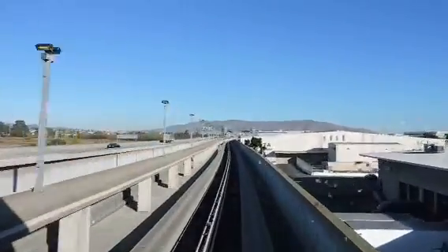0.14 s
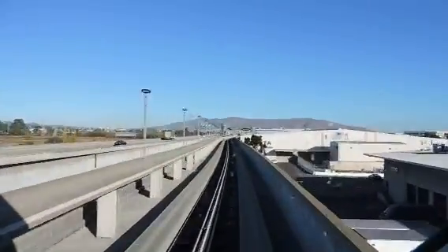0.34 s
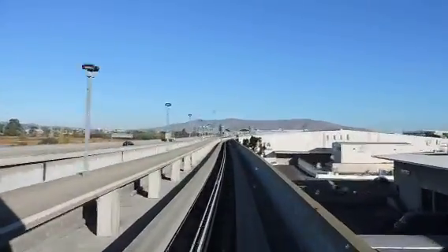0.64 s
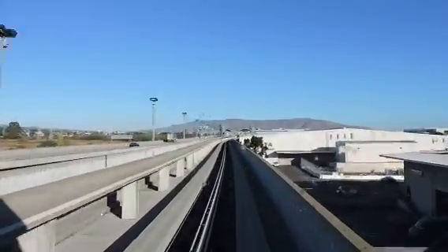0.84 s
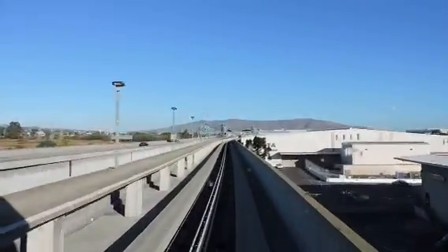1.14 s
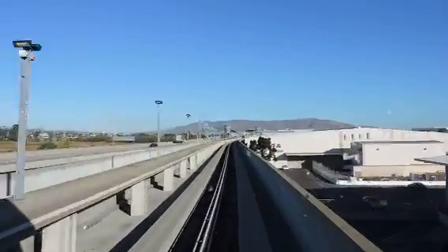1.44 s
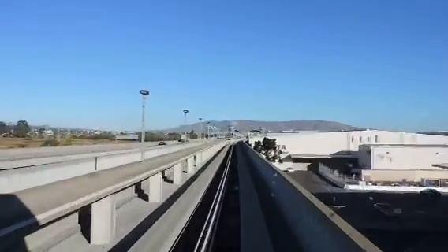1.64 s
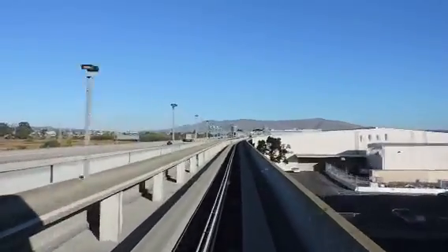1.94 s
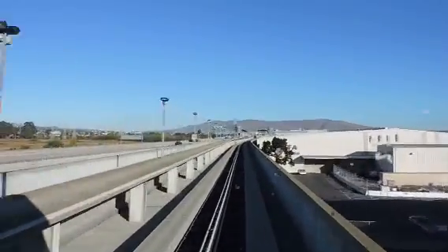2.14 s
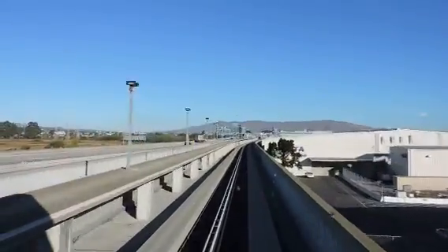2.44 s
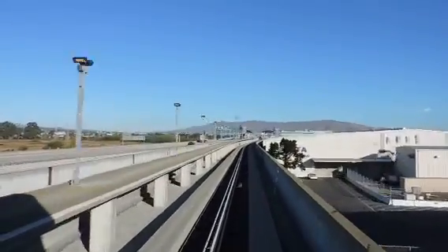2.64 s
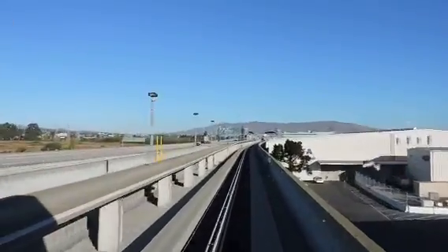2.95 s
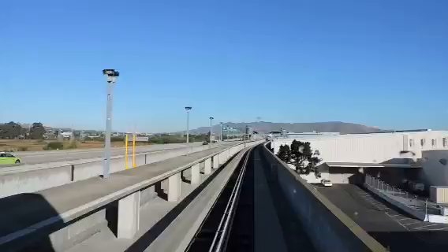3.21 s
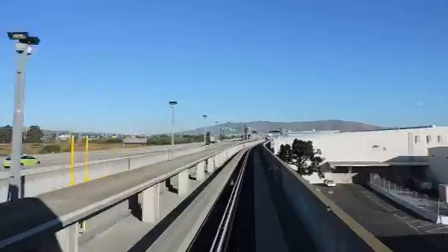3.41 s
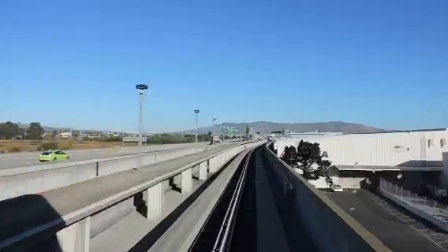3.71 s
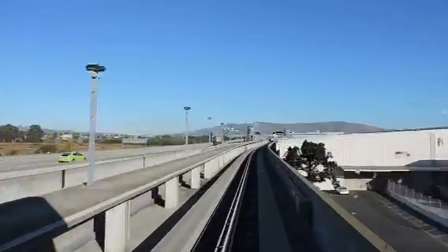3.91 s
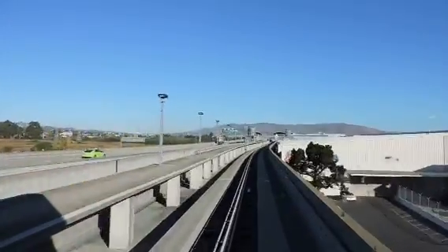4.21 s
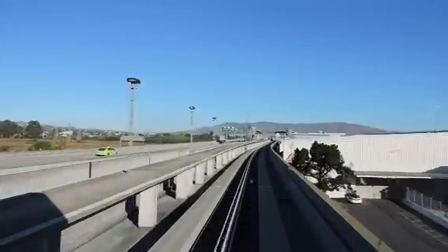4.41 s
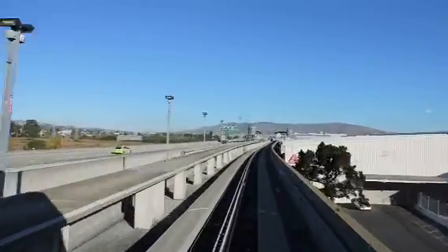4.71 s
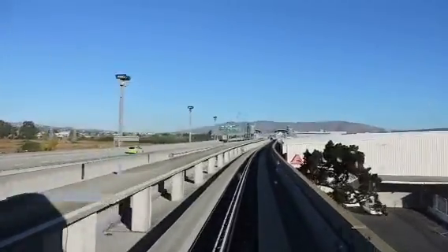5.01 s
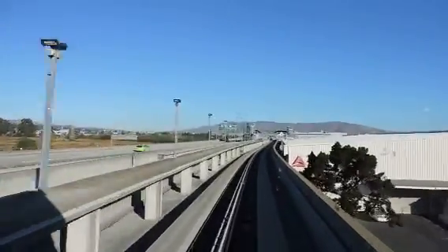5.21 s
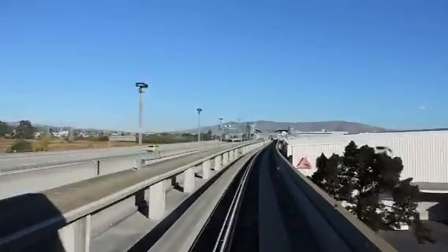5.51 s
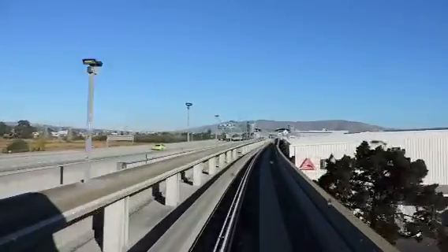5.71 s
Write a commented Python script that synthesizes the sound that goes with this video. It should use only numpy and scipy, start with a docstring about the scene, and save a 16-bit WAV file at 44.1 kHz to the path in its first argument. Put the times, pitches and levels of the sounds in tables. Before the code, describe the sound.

Heard from inside the front of an automated rubber-tyred car on an elevated concrete track. Heavy bass rumble and dull tyre roar run throughout, jolting unevenly. Soft thumps mark deck joints, trim rattles faintly, and a tiny squeak comes early. From about two seconds a gear whine enters and pulses more strongly toward the end. A short faint hiss comes past the middle, then sharp plastic ticks.

```python
"""Rubber-tyred people mover, interior

Ride along an elevated concrete guideway: filtered noise for body rumble, tyre roar and treble rush, resonances for
cabin boom, wavering sines for air throb, panel drone and a gear whine that climbs in pitch and swells in bursts.
Rough patches jolt the levels; joints thump the floor as decaying modes.
Fittings buzz, rattle and tick through plastic modes, trim squeaks as short sines, and one puff of noise hisses."""
import sys
import numpy as np
from scipy import signal
from scipy.fft import rfft, irfft, next_fast_len
from scipy.io import wavfile
from scipy.ndimage import uniform_filter1d

SR = 44100
rng = np.random.default_rng(int(sys.argv[2]) if len(sys.argv) > 2 else 0)


def store_wav(level_fs):
    """Save 16-bit WAV to argv[1]."""
    pcm = np.round(np.clip(np.atleast_2d(level_fs), -1, 1) * 32767)
    wavfile.write(sys.argv[1], SR, pcm.T.astype(np.int16))


N = 258413
TIME = np.arange(N) / SR
CUTOFF_HZ = 15800

# layer levels at 0 dB of road and jolt
RUMBLE_DB, THROB_DB, ROAR_DB, BOOM_DB, RUSH_DB = -23.5, -35, -34.0, -37.5, -66.0
# dB gained per dB of road roughness, jolt or roar
RUMBLE_PER_ROAD, THROB_PER_ROAD, THROB_PER_JOLT, RUSH_PER_ROAR = 0.21, 2.73, 2.2, 0.52
SIDEBAND_PER_JOLT = 0.33
# gear mesh: starting pitch, its climb as the car gains speed, fast level unevenness
MESH_HZ, MESH_RISE_HZ_PER_S, TOOTH_SHUDDER_DB = 667.8, 4.2, 1.3
PUFF_S, PUFF_DB, PUFF_ATTACK_DB_PER_S, PUFF_RELEASE_DB_PER_S = 3.735, -50.5, 330, 130


def from_db(db):
    """Decibels to gain."""
    return 10 ** (np.asarray(db) / 20)


def rms_one(x):
    """Scale to unit rms."""
    return x / np.sqrt(np.mean(x ** 2) + 1e-20)


def in_time(rows):
    """Each column of a curve at every sample."""
    s, *columns = np.transpose(rows)
    return [np.interp(TIME, s, c) for c in columns]


def at_hz(points, hz):
    """Read a spectrum on a log-frequency axis."""
    f, value = np.transpose(points)
    return np.interp(np.log(hz), np.log(f), value)


def pan(lean_db):
    """Left and right gains for a left-minus-right level difference."""
    return from_db(np.array([[.5], [-.5]]) * lean_db)


def swell(middle_s, length_s):
    """Smooth bell of height 1, length_s wide at half its height."""
    return np.exp2(-np.minimum(np.square(2 * (TIME - middle_s) / length_s), 60))


def bursts(rows, edge_s=.015):
    """Summed gain of scheduled bursts; each rises softly, holds and falls."""
    gain = 0
    for start_s, end_s, db in rows:
        rise = np.tanh((TIME - start_s) / edge_s)
        fall = np.tanh((TIME - end_s) / edge_s)
        gain = gain + from_db(db) * (rise - fall) / 2
    return gain


def drift(rate_hz):
    """Slow random curve of rms 1: noise through a double pole at 1/40 rate, interpolated."""
    step = 40
    r = np.exp(-2 * np.pi * rate_hz * step / SR)
    noise = rng.standard_normal(N // step + 2002)
    slow = signal.lfilter([1], [1, -2 * r, r * r], noise)[2000:]  # drop the settling
    return np.interp(np.arange(N) / step, np.arange(len(slow)), rms_one(slow))


def resonate(x, hz, width_hz):
    """Two-pole resonance with gain near 1 at its peak."""
    r = np.exp(-np.pi * width_hz / SR)
    zeros = np.array([1, 0, -1]) * (1 - r * r) / 2
    poles = [1, -2 * r * np.cos(2 * np.pi * hz / SR), r * r]
    return signal.lfilter(zeros, poles, x + 1e-18)


def cabin_noise(spectrum):
    """Coloured stereo noise, alike in both ears in the bass, diffuse in the treble; its middle has rms 1."""
    # left-right correlation: (frequency [Hz], correlation [-])
    ear_likeness = [(25, .95), (80, .985), (250, .945), (500, .74), (1000, .79), (2000, .28), (4000, -.12),
                    (9000, -.15), (15000, .05)]
    # left-right balance: (frequency [Hz], left minus right [dB])
    ear_lean = [(12, 11), (22, 8), (35, 5), (63, 3.2), (125, 1.5), (500, .3), (1200, 1.1), (15000, 1)]
    size = next_fast_len(N)
    hz = np.maximum(np.arange(size // 2 + 1) * SR / size, 1)
    mid, side = rfft(rng.standard_normal((2, size)))
    alike = np.clip(at_hz(ear_likeness, hz), -.99, .99)
    pair = np.sqrt(1 + alike) * mid + np.sqrt(1 - alike) * side * [[1], [-1]]
    coloured = pair * pan(at_hz(ear_lean, hz)) * from_db(at_hz(spectrum, hz))
    out = irfft(coloured, size)[:, :N]
    return out / np.std(out.mean(axis=0))


def steadied(x, span_s):
    """Even out the slow swells of a noise to rms near 1, keeping its fast grain."""
    power = uniform_filter1d(np.mean(np.atleast_2d(x), axis=0) ** 2, int(span_s * SR) + 1)
    return x / np.sqrt(power + 1e-12)


def tone(hz, waver_hz, flutter_db, ear_phase_rad=0.26):
    """Sine of rms near 1, wavering in pitch and level, its phase leading in the left ear."""
    phase = 2 * np.pi * np.cumsum(hz + waver_hz * drift(14)) / SR
    wave = np.sqrt(2) * np.sin(phase + ear_phase_rad * np.array([[1], [-1]]))
    return wave * from_db(flutter_db * drift(18))


def jolts():
    """Rises of rumble, roar and boom [dB] at every sample, as the track jolts the car or lets it glide."""
    # (middle [s], length [s], rumble rise [dB], roar rise [dB], boom rise [dB])
    track_patches = [(0.115, 0.038, -4, -1, 2.5), (0.335, 0.036, -0.5, -2, -4), (0.668, 0.062, 4, 3.5, 6.5),
                     (0.79, 0.13, 5, 2, 4.5), (0.897, 0.066, 4, 1.5, -2.5), (1.068, 0.042, 5, 0, 1),
                     (1.226, 0.069, -0.5, -2.5, -0.5), (1.43, 0.35, 4.5, 4.5, 4), (1.94, 0.62, 3, 1.5, 5),
                     (2.25, 0.1, -1, -1, -3), (2.357, 0.048, 1.5, 2, -1), (2.646, 0.18, 5, 1.5, 3),
                     (2.808, 0.13, -3, 1.5, -2), (3.2, 0.24, 5, 2.5, 4.5), (3.286, 0.14, -2, -0.5, -7),
                     (3.515, 0.11, 3.5, 1, 2), (3.656, 0.067, 0.5, 1.5, -2), (3.758, 0.053, 3, 3, 0),
                     (3.85, 0.037, -4, 0.5, -3), (3.998, 0.083, 4, 2.5, 3.5), (4.1, 0.04, 2, 0.5, -2),
                     (4.387, 0.07, 5.5, 4, 2), (4.488, 0.042, -5, -0.5, 1), (4.592, 0.035, -5, -1, 1),
                     (4.73, 0.08, -2, -0.5, -6), (4.924, 0.085, -0.5, 2.5, 3), (5.01, 0.056, 5, 2, 0.5),
                     (5.31, 0.028, 4, -0.5, 1.5), (5.401, 0.075, 1, 2, -2), (5.653, 0.38, 3.5, 1.6, 0)]
    return sum(np.outer(rises_db, swell(s, length_s)) for s, length_s, *rises_db in track_patches)


def rush(rush_db, flicker_db=2.5):
    """Running gear as flickering treble noise, plus a steady thin whistle from the drive electronics."""
    # treble spectrum: (frequency [Hz], relative density [dB])
    rush_spectrum = [(1500, -5), (3500, 15), (4500, 12), (5800, 8), (7000, 3), (9000, 2), (11000, -1),
                     (13500, 0), (15500, -6.5)]
    whistle = from_db(-83) * rms_one(resonate(rng.standard_normal(N), 9530, width_hz=160))
    return from_db(rush_db + flicker_db * drift(24)) * cabin_noise(rush_spectrum) + whistle


def body(rumble_db, throb_db, air_mode_hz=63.56):
    """Car body shaking on its suspension (bass noise); cabin air throbbing at its lowest mode (sine)."""
    # body spectrum: (frequency [Hz], relative density [dB])
    body_spectrum = [(5, -28.5), (12, 2), (22, 0), (33, -4.5), (41, -12), (52, -10), (63, -9), (75, -8),
                     (100, -7.5), (122, -5), (137, -9.5), (150, -23), (170, -27), (700, -125)]
    shake = from_db(rumble_db) * steadied(cabin_noise(body_spectrum), span_s=.1)
    throb = from_db(throb_db) * tone(air_mode_hz, waver_hz=3.5, flutter_db=2.5)
    return shake + throb * pan(3.0)


def puff(crackle_db=3.2):
    """One short hiss of coloured noise, finely crackling, with a fast rise and slower decay."""
    # hiss spectrum: (frequency [Hz], relative density [dB])
    puff_spectrum = [(800, 0), (2000, 10), (5000, -2), (8500, -2), (13000, -8), (16000, -22)]
    age_s = TIME - PUFF_S
    puff_db = PUFF_DB + np.minimum(PUFF_ATTACK_DB_PER_S * age_s, -PUFF_RELEASE_DB_PER_S * age_s)
    crackle = rms_one(from_db(crackle_db * drift(400)))
    return from_db(puff_db) * crackle * cabin_noise(puff_spectrum)


def squeaks(overtone_db=-17.0):
    """Rubbing trim in stick-slip: brief sines of unsteady pitch; low ones carry an octave."""
    # (start [s], length [s], pitch [Hz], pitch spread [Hz], level [dB])
    squeak_rows = [(1.563, .027, 3170, 10, -48), (1.586, 0.026, 3180, 12, -47.5),
                   (1.606, .055, 3160, 10, -60), (3.666, 0.053, 13550, 160, -60),
                   (3.67, .04, 12200, 200, -70), (4.332, 0.031, 11400, 700, -64)]
    out = np.zeros(N)
    for s, length_s, hz, spread_hz, db in squeak_rows:
        shape = np.sin(np.pi * np.clip((TIME - s) / length_s, 0, 1) ** 0.8)
        phase = 2 * np.pi * np.cumsum(hz + spread_hz * drift(350)) / SR
        octave = from_db(overtone_db) * np.sin(2 * phase) * (2 * hz < CUTOFF_HZ)
        out += from_db(db) * shape * (np.sin(phase) + octave)
    return out * pan(3.2)


def chatter(per_s, spread_db=3.0):
    """Random small contacts of uneven strength, different at each ear; rms 1."""
    contacts = (rng.random((2, N)) < per_s / SR) * rng.choice([-1, 1], (2, N))
    strength_db = spread_db * np.minimum(rng.exponential(1, (2, N)), 4)
    return rms_one(contacts * from_db(strength_db))


def fitting_ring(force, heft_db):
    """Hard plastic modes of alternating sign; heft_db tilts their levels per octave below 9 kHz."""
    # (frequency [Hz], width [Hz], level [dB])
    plastic_modes = [(1000, 140, 9), (1380, 160, 10), (1650, 120, 9), (1950, 260, 9), (2600, 450, 2.5),
                     (3600, 900, -4), (4900, 800, -8), (6900, 500, -5.5), (8100, 800, -2), (9100, 700, -2),
                     (11000, 900, 0), (12600, 1200, 0), (14500, 1000, -9)]
    out = 0
    for k, (hz, width_hz, db) in enumerate(plastic_modes):
        mode_db = db + heft_db * np.clip(np.log2(9000 / hz), -1, 2)
        out = out + (-1) ** k * from_db(mode_db) * resonate(force, hz, width_hz)
    return out


def fittings(rush_db, tail_db=-22.0, tail_t60_s=.19, trim_db=6.5, buzz_db=-7.0):
    """Loose trim driven through plastic modes: fitful buzz, short rattles, sharp ticks with a short echo tail."""
    # rattles: (middle [s], length [s], level before trim [dB], left minus right [dB], heft [dB/octave down])
    rattle_rows = [(1.055, 0.016, -64, -6, 0), (1.33, .025, -60, 2, 4), (1.4, .06, -64, 1, 4.5),
                   (1.962, .025, -65, 2, 1), (2.958, 0.033, -69, 1, 9), (3.288, 0.024, -58, .5, 4),
                   (4.292, .02, -62, 1, 6.5), (4.35, .035, -59, 1, 4.5), (5.0, .025, -63, 0, 2)]
    # ticks: (time [s], level before trim [dB], left minus right [dB], t60 [s], heft [dB/octave down])
    tick_rows = [(0.641, -42, -4, .022, 0), (0.6835, -51, -5, .03, 2), (3.9746, -31, -5, 0.0098, 4),
                 (4.0054, -54, -.5, .02, -1), (4.625, -32.5, -3, 0.011, 0.5), (4.632, -54, -1, .015, 3),
                 (4.6655, -57, 0, .02, 3)]
    buzz_gain = from_db(rush_db + buzz_db + 3 * drift(20)) * pan(1.0)
    out = fitting_ring(buzz_gain * rng.standard_normal((2, N)), 0)
    contacts, crack = chatter(per_s=3000), rng.standard_normal((2, N))
    for s, length_s, db, lean_db, heft_db in rattle_rows:
        span = slice(int((s - 2 * length_s) * SR), int((s + 2 * length_s) * SR))
        gain = from_db(db + trim_db) * pan(lean_db)
        out[:, span] += fitting_ring(gain * swell(s, length_s)[span] * contacts[:, span], heft_db)
    for s, db, lean_db, t60_s, heft_db in tick_rows:
        span = slice(int(s * SR), int(s * SR) + SR // 2)
        age_s = TIME[span] - s
        shape = from_db(-60 * age_s / t60_s) + from_db(tail_db - 60 * age_s / tail_t60_s)
        gain = from_db(db + trim_db) * pan(lean_db)
        out[:, span] += fitting_ring(gain * shape * crack[:, span], heft_db)
    return out


def thumps(rise_s=0.0035):
    """Tyres dropping softly over deck joints: each sets the floor modes ringing."""
    # joints: (time [s], level [dB])
    joint_rows = [(0.083, -37), (0.73, -30), (1.29, -27), (1.41, -28.5), (1.51, -29.5), (2.555, -27.5),
                  (2.9, -30), (3.972, -24.5), (4.621, -36), (5.134, -30.5), (5.54, -26.5)]
    # floor: (frequency [Hz], level re the thump [dB], t60 [s])
    floor_modes = [(103, -2.5, 0.15), (211, -9.5, 0.25), (240.5, 2.5, 0.26), (297, 1, 0.14)]
    out = np.zeros(N)
    for s, db in joint_rows:
        span = slice(int(s * SR), int(s * SR) + SR // 2)
        age_s = TIME[span] - TIME[span][0]
        onset = 1 - np.exp(-age_s / rise_s)
        for hz, mode_db, t60_s in floor_modes:
            ring = np.sin(2 * np.pi * (hz * age_s + rng.random()))
            out[span] += from_db(db + mode_db - 60 * age_s / t60_s) * onset * ring
    return out * pan(1.0)


def drive(jolt_db, idle_db=-1.5, drone_hz=491.0):
    """Gear mesh tone swelling as the teeth take load, a sideband on either side, and a fitfully droning panel."""
    # sidebands: (time [s], lower level [dB], upper level [dB])
    sideband_curve = [(1.8, -75, -72), (2.05, -44, -57), (2.6, -46, -62), (3.6, -46, -54),
                      (3.9, -43.5, -49.5), (5.0, -55, -49), (5.86, -50, -50)]
    # tooth load: (start [s], end [s], level [dB])
    whine_rows = [(2.33, 2.56, -46), (2.585, 2.675, -32), (2.745, 2.9, -35), (2.945, 3.11, -34.5),
                  (3.12, 3.31, -38), (3.45, 3.53, -37.5), (3.56, 3.83, -39), (3.86, 3.94, -38),
                  (4.04, 4.24, -39), (4.26, 4.36, -34.5), (4.38, 4.425, -27.5), (4.46, 4.7, -40.5),
                  (4.75, 4.87, -36), (4.9, 4.94, -33), (4.945, 5.01, -27.5), (5.04, 5.26, -36),
                  (5.35, 5.445, -29), (5.485, 5.69, -28.5), (5.72, 5.9, -35)]
    # panel drone: (start [s], end [s], level [dB])
    drone_rows = [(2.575, 2.62, -34.5), (3.18, 3.22, -38), (4.63, 4.72, -37), (4.835, 4.885, -33),
                  (5.06, 5.135, -34.5), (5.24, 5.385, -35), (5.405, 5.5, -35), (5.5, 5.575, -28.5),
                  (5.575, 5.71, -35.5), (5.71, 5.83, -39)]
    mesh_hz = MESH_HZ + MESH_RISE_HZ_PER_S * TIME
    spacing_hz = mesh_hz * .182
    lower_db, upper_db = in_time(sideband_curve) + SIDEBAND_PER_JOLT * jolt_db
    idle = from_db(lower_db + idle_db)  # whine between bursts follows the lower sideband
    load = (idle + bursts(whine_rows)) * from_db(TOOTH_SHUDDER_DB * drift(60))
    whine = load * tone(mesh_hz, waver_hz=2.6, flutter_db=1.0)
    lower = from_db(lower_db) * tone(mesh_hz - spacing_hz, waver_hz=2.2, flutter_db=2.5)
    upper = from_db(upper_db) * tone(mesh_hz + spacing_hz, waver_hz=3.5, flutter_db=3.0)
    drone = bursts(drone_rows) * tone(drone_hz, waver_hz=2.5, flutter_db=1.2)
    return (whine + lower + upper) * pan(-0.36) + drone * pan(.3)


def tyres(roar_db, boom_db, grain_db=1.01):
    """Rubber on rough concrete: broad noise roar, and cabin resonances stirred by noise."""
    # roar spectrum: (frequency [Hz], relative density [dB])
    roar_spectrum = [(110, -1.5), (170, -2.5), (205, -1.5), (300, 1), (405, -8), (470, -3.5), (720, -5.5),
                     (905, -10.5), (970, -8.5), (1150, -8), (1330, -12), (1650, -13.5), (2400, -25.5),
                     (3400, -30), (4600, -40), (8000, -93)]
    # cabin resonances: (frequency [Hz], width [Hz], level re the boom [dB])
    cabin_modes = [(232, 4, -9), (250.9, 7.1, -6.5), (276.3, 4.3, -11), (294, 8.5, -25.5),
                   (371.1, 8.9, -11.5), (487.6, 11.6, -10), (610.6, 9.9, -18.5), (1150, 13, -21.5),
                   (1190, 12, -17), (3430, 170, -33)]
    roar = from_db(roar_db + grain_db * drift(28)) * cabin_noise(roar_spectrum)
    boom = np.zeros(N)
    for hz, width_hz, db in cabin_modes:
        ringing = resonate(rng.standard_normal(N), hz, width_hz)
        boom += from_db(db) * steadied(ringing, span_s=0.55)
    return roar + from_db(boom_db) * boom * pan(0.97)


def scene():
    """Mix at the front window; road and jolts set the running layers and the trim buzz."""
    # surface roughness: (time [s], level re an ordinary stretch [dB])
    road_curve = [(0, 3), (0.5, 1.6), (0.8, 0.5), (1.1, -1.2), (1.9, -2.6), (2.45, -0.55), (2.8, 0),
                  (3.5, -0.5), (4.7, 0.2), (5.1, 3), (5.6, 1.5), (5.86, 0)]
    (road_db,) = in_time(road_curve)
    body_jolt_db, tyre_jolt_db, boom_jolt_db = jolts()
    rumble_db = RUMBLE_DB + RUMBLE_PER_ROAD * road_db + body_jolt_db
    throb_db = THROB_DB + THROB_PER_ROAD * road_db + THROB_PER_JOLT * body_jolt_db
    roar_db = ROAR_DB + road_db + tyre_jolt_db
    boom_db = BOOM_DB + road_db + boom_jolt_db
    rush_db = RUSH_DB + RUSH_PER_ROAR * (road_db + tyre_jolt_db)
    running = rush(rush_db) + body(rumble_db, throb_db) + drive(tyre_jolt_db) + tyres(roar_db, boom_db)
    return running + puff() + squeaks() + fittings(rush_db) + thumps()


def record(dry):
    """Fade the last 4 ms to avoid a click, then cut steeply above CUTOFF_HZ."""
    ending = np.minimum((TIME[-1] - TIME) / .004, 1)
    lowpass = signal.ellip(12, .1, 80, CUTOFF_HZ, fs=SR, output="sos")
    return signal.sosfilt(lowpass, dry * ending)


dry = scene()
out = record(dry)
store_wav(out)
```